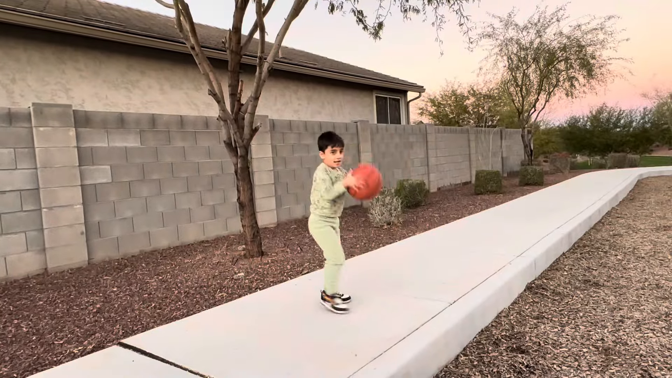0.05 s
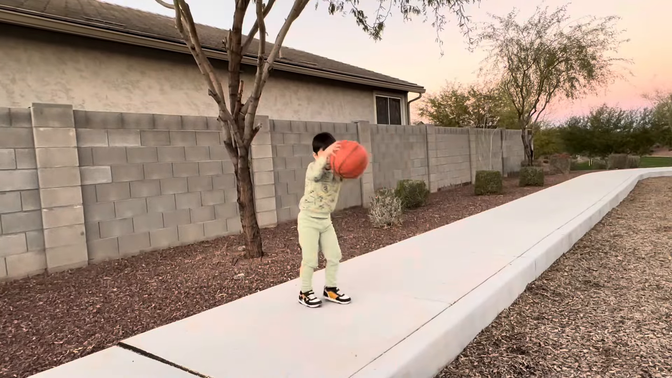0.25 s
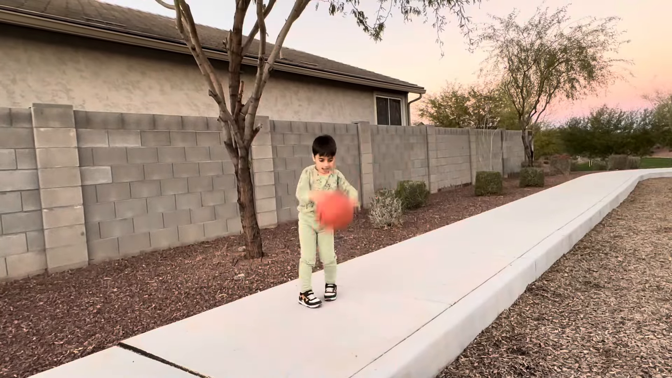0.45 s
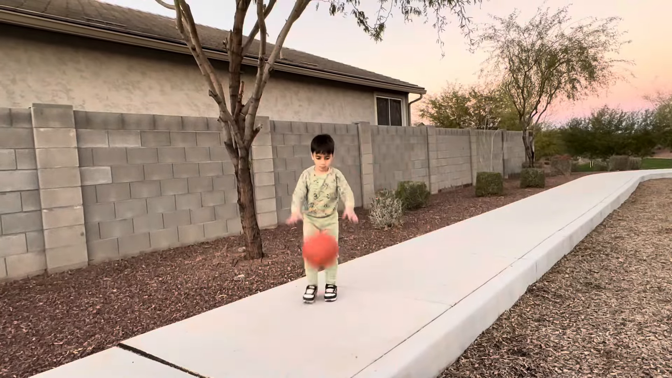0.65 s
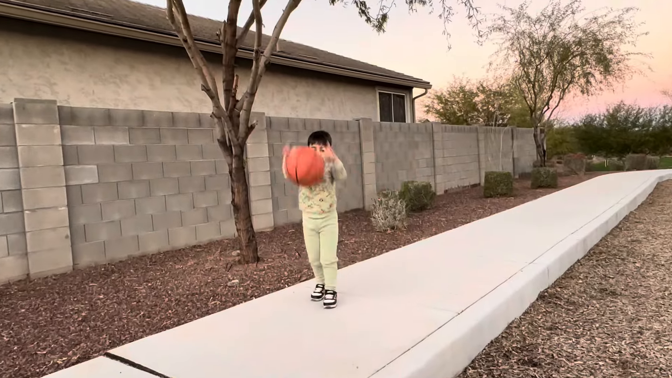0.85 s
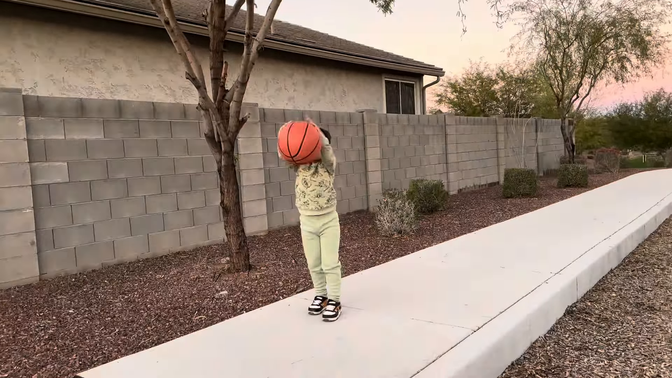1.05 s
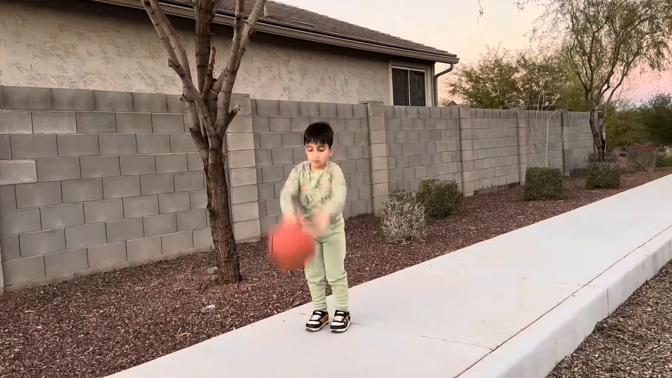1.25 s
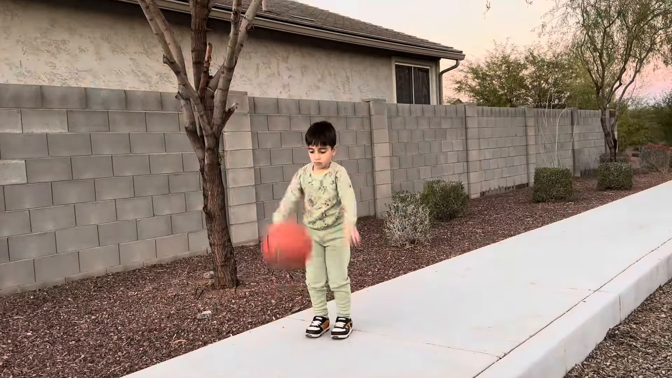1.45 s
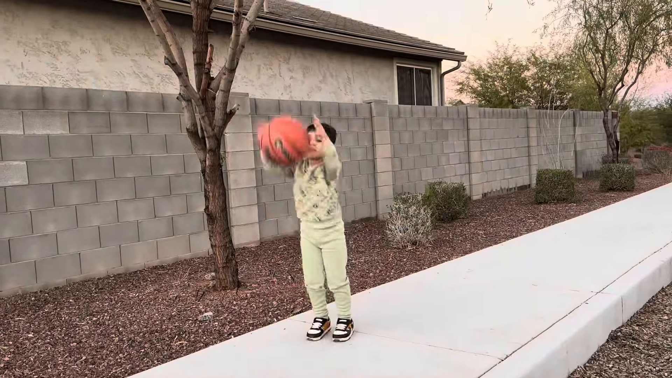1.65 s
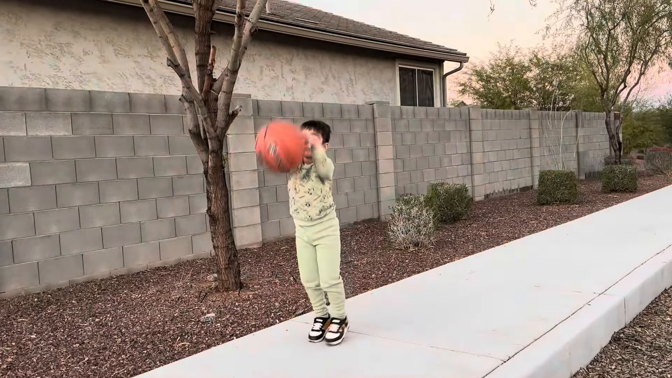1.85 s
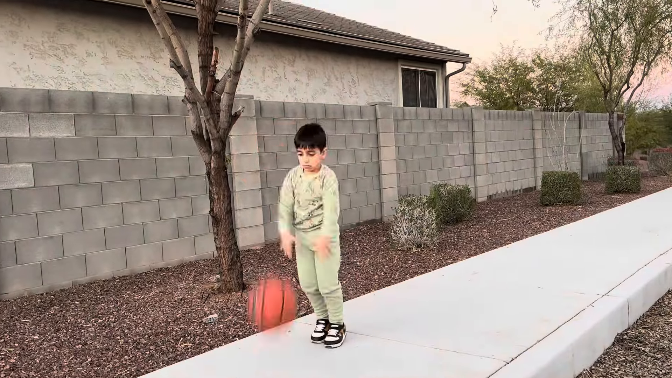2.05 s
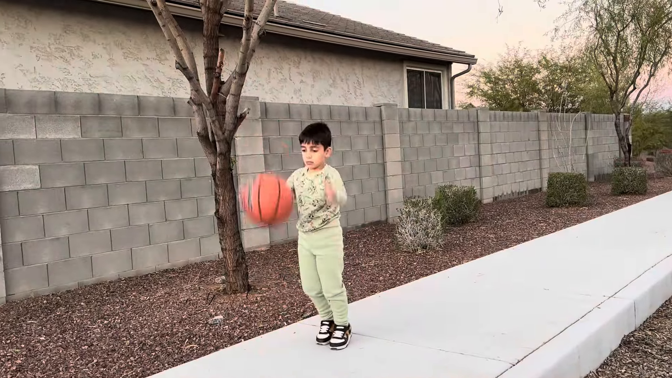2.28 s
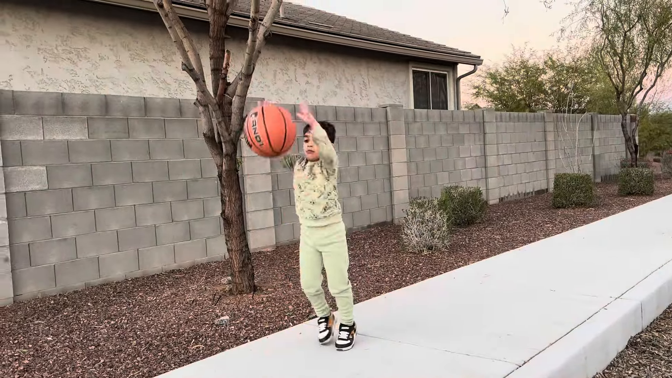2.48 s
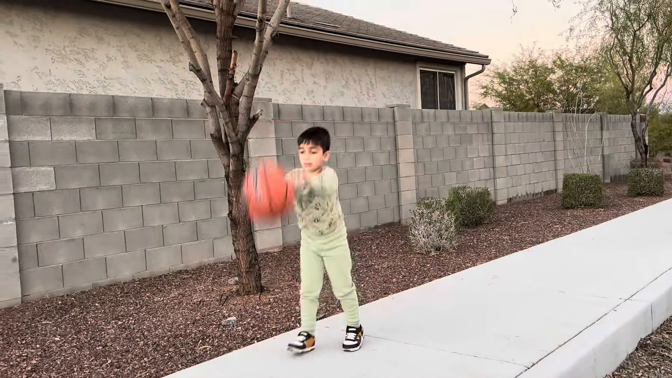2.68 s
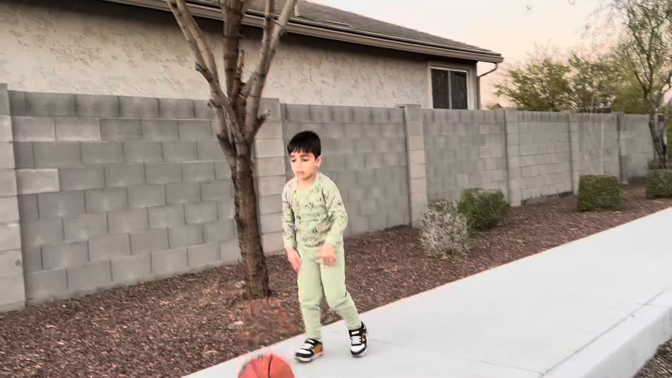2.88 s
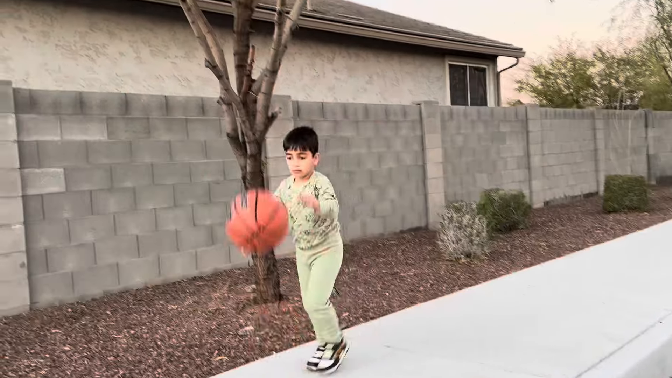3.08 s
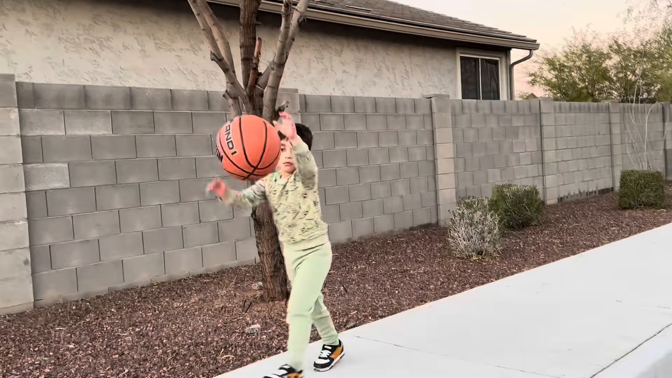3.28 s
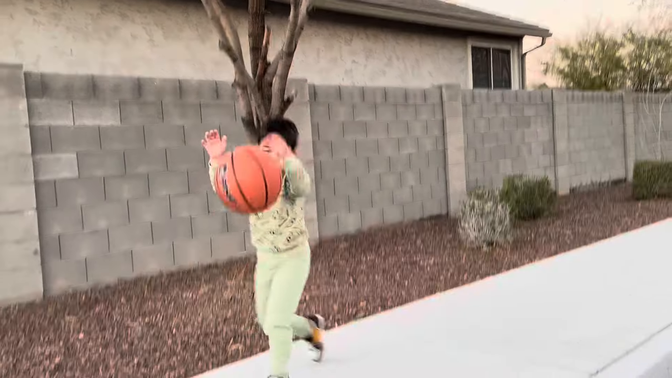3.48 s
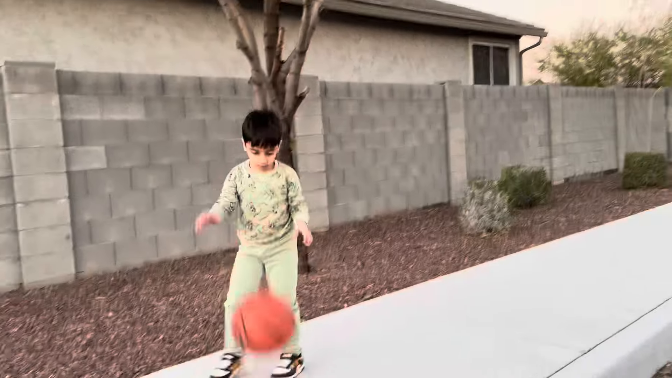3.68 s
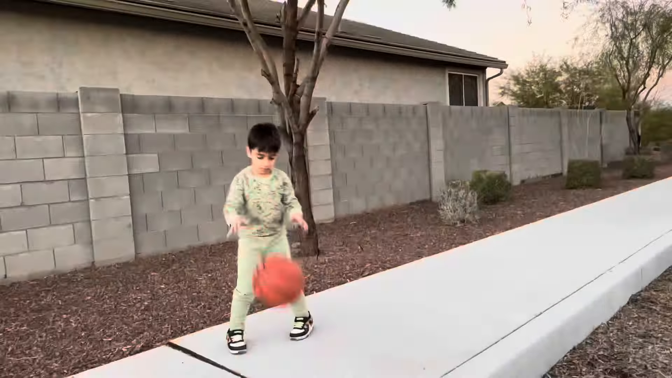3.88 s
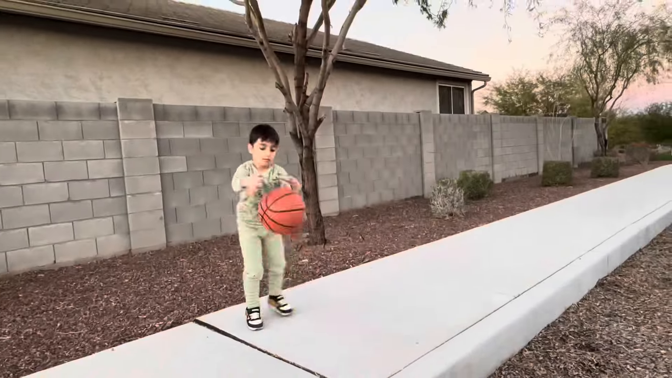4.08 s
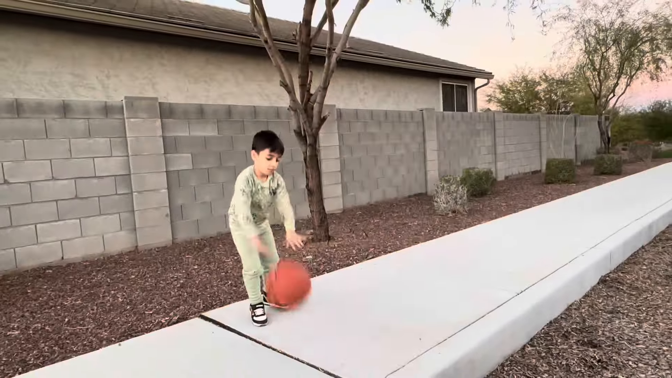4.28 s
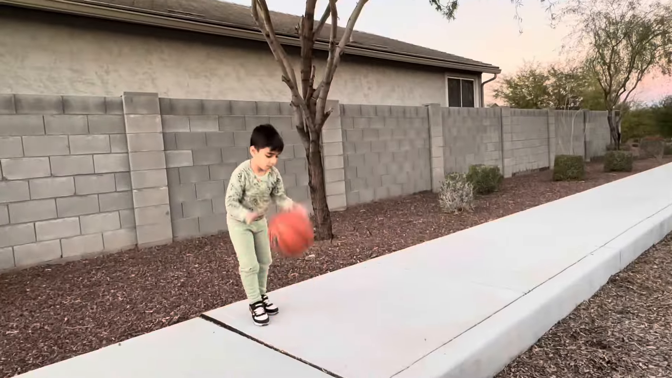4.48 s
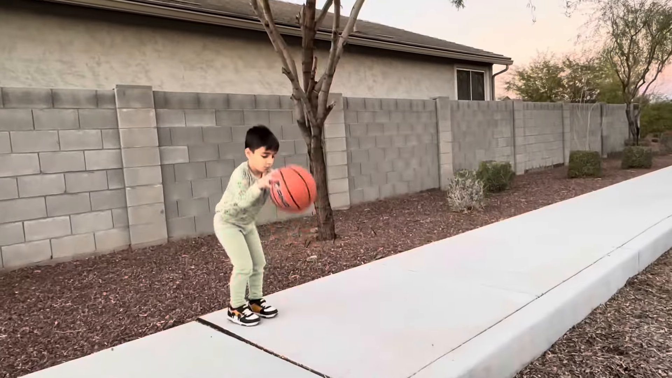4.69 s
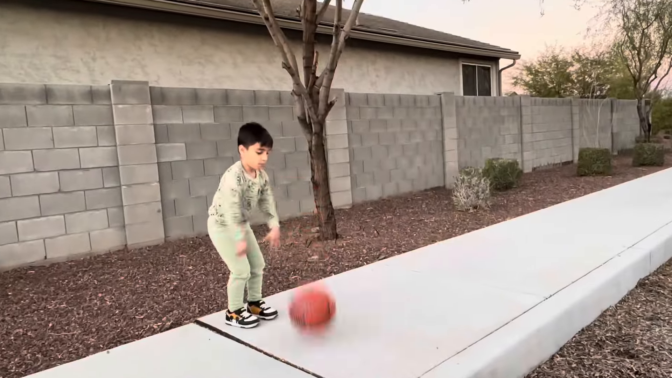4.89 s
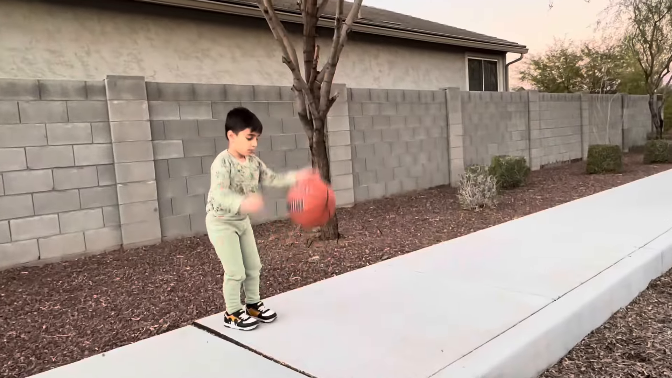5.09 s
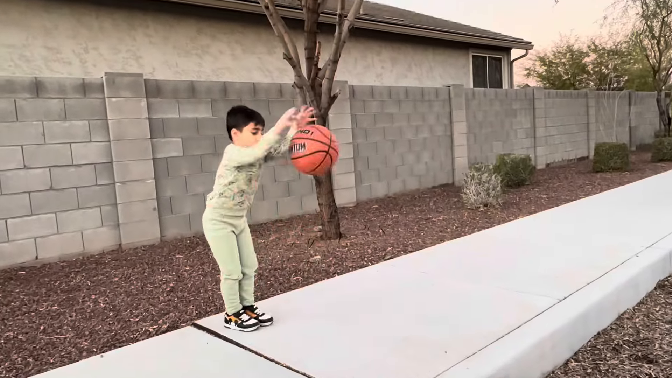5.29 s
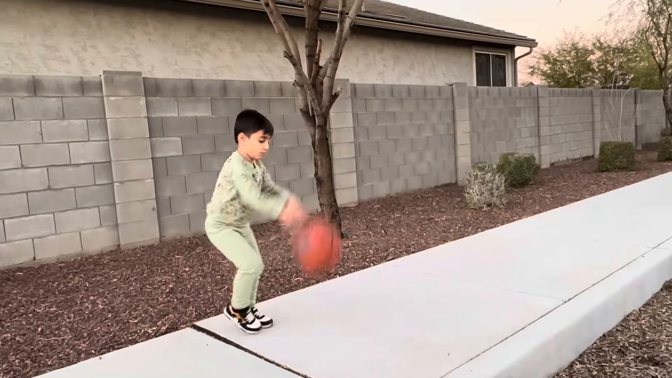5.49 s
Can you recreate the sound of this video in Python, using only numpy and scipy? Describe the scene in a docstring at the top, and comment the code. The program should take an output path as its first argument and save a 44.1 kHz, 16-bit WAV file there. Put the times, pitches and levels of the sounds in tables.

```python
"""Basketball beside a block wall

A child bounces a basketball seven times on concrete, on a quiet evening. Each bounce sums a filtered click,
a damped sine knock, a gliding-sine thump, shell modes and faint beating air modes; delayed copies are echoes.
Hands and shoes are tones in noise bands, scuffs and rustles grainy noise, one faint chirp narrow noise.
Distant traffic is filtered noise that drifts in level.
"""
import sys
import numpy as np
from scipy import signal
from scipy.fft import rfft, irfft
from scipy.io import wavfile
from scipy.ndimage import uniform_filter1d

SR = 44100
rng = np.random.default_rng(int(sys.argv[2]) if len(sys.argv) > 2 else 0)


def wav_out(sig):
    """Save sig, one row per channel (or a flat mono array), as 16-bit PCM at SR to the path in sys.argv[1]."""
    wavfile.write(sys.argv[1], SR, np.round(np.clip(np.atleast_2d(sig).T, -1, 1) * 32767).astype(np.int16))


N = 244314

# distant traffic spectrum: (frequency [Hz], relative density [dB])
TRAFFIC_SPECTRUM = [(15, -35.5), (25, -10.5), (60, -1), (120, 0), (150, -8.5), (280, -11), (480, -19.5),
                    (950, -14), (1500, -23.5), (2200, -27.5), (3200, -39.5), (5000, -46.5), (8000, -52.5),
                    (16000, -67)]
# traffic drift, used about its mean and scaled down: (time [s], relative level [dB])
TRAFFIC_DRIFT = [(0.0, -57.5), (1.25, -58.5), (1.53, -57), (2.76, -57.5), (3.08, -61.5), (4.29, -56),
                 (5.18, -61), (5.54, -60.5)]
# likeness of the two ears for far sound: (frequency [Hz], likeness [0-1])
EAR_LIKENESS = [(100, 0.98), (400, 0.6), (1000, 0), (2500, 0.1), (8000, 0.3)]
# soles brushing the path: (time [s], length [s], level [dB])
SCUFFS = [(0, .21, -53.5), (.362, 0.067, -65), (.744, 0.08, -56), (0.801, 0.19, -66), (1.149, 0.052, -55)]
# friction spectrum: (frequency [Hz], relative level [dB])
BRUSH_SPECTRUM = [(300, -10.5), (1500, 2.5), (3500, 0), (6000, -2.5), (9000, -4.5), (16000, -4.5)]
# hands on the ball, low palm push to high finger slap: (time [s], level [dB], pitch [Hz], tick level [dB])
PATS = [(.026, -53, 484, -65), (.371, -52, 460, -59.5), (2.58, -42, 420, -61), (3.566, -47.5, 261.3, -47.5),
        (3.593, -43, 211, -52), (4.161, -40.5, 365, -56), (4.744, -42, 316, -49.5),
        (4.768, -40, 223.7, -63), (5.351, -38, 421, -63), (5.382, -44, 428, -60.5)]
# bounces: (time [s], force [dB], squash time [s], bite [dB], sizzle [dB],
#           knock pitch [Hz], knock level [dB], shell wobble [dB])
BOUNCES = [(.5752, -1, .016, 3.5, -1.5, 920, -12, 1), (1.335, .5, 0.01385, -1.5, 4, 932, -7.5, -2.5),
           (2.083, 1, 0.015, -8, 3.5, 990, -9, 0), (2.8698, 2, .0108, -3.5, -4, 332, -19.5, -2.5),
           (3.7667, -4, 0.016, -3, 3, 1870, -23, 5), (4.3375, -3, 0.01332, 2.5, .5, 924, -16.5, -0.5),
           (4.8861, .5, .012, -1.5, 1.5, 1120, -9.5, 5)]
# rubber on concrete: (frequency [Hz], relative level [dB])
CRACK_SPECTRUM = [(100, -27), (300, -12), (700, 8), (1200, 4.5), (1600, 1), (2200, 2.5), (3000, -2.5),
                  (4600, -4.5), (6200, -11), (9000, -11), (12000, -15.5), (16000, -18)]
# thump glide: (first pitch [Hz], last pitch [Hz], time constant [s])
THUMP_GLIDE = (355, 66, .0062)
# rubber shell modes: (frequency [Hz], relative level [dB], t60 [s])
SHELL_MODES = [(193, -23.5, 0.086), (249.6, -24.5, 0.11), (360.2, -24.5, 0.1), (381.7, -26, 0.11),
               (470.5, -26, 0.09), (681, -27, .06), (823.5, -28.5, 0.085), (1007, -32, 0.087)]
# modes of the air in the ball: (frequency [Hz], relative level [dB], t60 [s])
AIR_MODES = [(955, -41.5, 0.31), (1510, -64.5, 0.24), (2100, -55.5, 0.51), (2756, -60.5, 1.7),
             (3360, -67, 1.7), (3550, -69.5, 1.2), (4030, -68.5, .9), (4276, -66.5, 1.3), (4600, -66.5, .5)]
# ball to wall as the child wanders: (time [s], distance [m])
WALL_DISTANCE = [(.58, 3.06), (2.08, 2.94), (3.77, 3.2), (4.89, 3.18)]
# scatter from gravel, house and trees: (frequency [Hz], relative level [dB], t60 [s])
YARD_SCATTER = [(60, -20, 0.26), (200, -20.5, 0.26), (490, -9, 0.17), (1000, -13.5, 0.15),
                (2520, -16, 0.24), (5350, -10.5, 0.25), (8700, -10.5, 0.19), (16130, -19.5, 0.092)]
# shoes on concrete: (time [s], level [dB], pitch [Hz], tick level [dB])
STEPS = [(1.278, -47.5, 527, -58.5), (2.0532, -39.5, 2380, -43), (2.699, -39, 300, -54),
         (4.4316, -35, 430, -56)]
# one faint chirp: (time [s], length [s], level [dB])
CHIRP = (5.46, 0.14, -62.5)
# microphone ports: (frequency [Hz], phase by which left leads [rad])
PORT_PHASE = [(50, 0), (400, 0), (900, -.25), (1810, .3), (3010, 1.1), (4570, 0), (6630, .2), (7580, 3.5),
              (8350, 6), (9560, 5), (11000, 3.1), (13900, .3), (16000, -.4)]
# port balance: (frequency [Hz], left minus right [dB])
PORT_BALANCE = [(100, -.5), (350, .4), (700, -2.4), (1400, -1.5), (2800, 2.3), (5600, 1.7), (11000, .3)]
# microphone colour: (frequency [Hz], gain [dB])
MIC_COLOUR = [(20, -15), (45, 0.5), (9700, 2), (11000, -5.5), (11900, -16.5), (13300, -1.5), (15500, -0.5),
              (16500, -8)]

TRAFFIC_DB, DRIFT_SHARE = -50, 0.46
SCUFF_DB_PER_OCTAVE = 1.5
RUSTLES_PER_S, RUSTLE_S, RUSTLE_DB, RUSTLE_DB_PER_OCTAVE = 1.7, 0.099, -69.5, -3
PAT_HZ, PAT_DECAY_S, PAT_DAMPING_POWER = 454, 0.011, 1.9  # lower pats ring longer
CLAP_HZ, CLAP_DB, CLAP_DB_PER_OCTAVE, CLAP_DECAY_S = 1010, -0.5, 23, .011  # stronger in a slap
PALM_HZ, PALM_DB, PALM_DECAY_S = 230, -4, 0.01
TAP_RISE_S = .0008
# part levels of a bounce of force 0 dB and reference squash time
THUMP_DB, CRACK_DB, SHELL_DB, AIR_DB, SQUASH_S = -10, -1.2, 1, -6, .0135
CRACK_DB_PER_DB = 0.18  # the crack grows more slowly than the force
SHELL_DB_PER_HALVING = 6.5  # a quicker squash shakes the shell harder
BITE_HZ, SIZZLE_HZ = 4160, 8350  # crack bands set per bounce
WOBBLE_HZ, WOBBLE_OCTAVES = 380, .5  # band of shell modes set per bounce
SLAP_S, SLAP_POWER = .0025, 1.8  # second slap of the skin, later in a slower squash
SOUND_M_PER_S = 343
STEP_DECAY_S = 0.0061
GRIT_PER_S, GRIT_DB, GRIT_HZ, GRIT_DECAY_S = 2, -68, 900, .003
CHIRP_HZ = 3300
EDGE_HZ = 16700


def gain_of(db):
    """Amplitude factor of a level in dB."""
    return 10 ** (np.asarray(db) / 20)


def evened(x):
    """Scales x to an RMS of 1."""
    return x / np.sqrt(np.mean(x ** 2) + 1e-20)


def read(points, hz):
    """Interpolates a table on a log frequency axis."""
    f, value = np.transpose(points)
    return np.interp(np.log(hz + 1), np.log(f + 1), value)


def bins(size):
    """Frequencies of the real FFT bins, in Hz."""
    return np.fft.rfftfreq(size, 1 / SR)


def octaves(hz, centre_hz):
    """Distance from the centre in octaves, offset to stay finite at 0 Hz."""
    return np.log2((hz + 20) / centre_hz)


def add(mix, s, sound):
    """Adds a sound to the mix at time s, cut at the end."""
    part = mix[..., max(round(s * SR), 0):][..., :sound.shape[-1]]
    part += sound[..., :part.shape[-1]]


def coloured(x, db):
    """Filters x by a gain in dB for each frequency bin."""
    return irfft(rfft(x) * gain_of(db), x.shape[-1])


def noise_of(size, db):
    """Noise of RMS 1 with a spectrum in dB."""
    return evened(coloured(rng.standard_normal(size), db))


def delayed(x, s, corner_hz):
    """A later copy that has lost treble above the corner."""
    hz = bins(x.shape[-1])
    shift = np.exp(-2j * np.pi * hz * s)
    return irfft(rfft(x) * shift / (1 + 1j * hz / corner_hz), x.shape[-1])


def two_ears(a, b):
    """Two unrelated signals become a pair that is alike in the bass."""
    same = np.clip(read(EAR_LIKENESS, bins(len(a))), 0, 1)
    mid = rfft(a) * np.sqrt((1 + same) / 2)
    side = rfft(b) * np.sqrt((1 - same) / 2)
    return irfft(np.array([mid + side, mid - side]), len(a))


def traffic(flutter_db=0.55):
    """A far, dull wash of noise that drifts and flutters slowly in level."""
    hiss = evened(coloured(two_ears(*rng.standard_normal((2, N))), read(TRAFFIC_SPECTRUM, bins(N))))
    s, db = np.transpose(TRAFFIC_DRIFT)
    drift_db = DRIFT_SHARE * np.interp(np.arange(N) / SR, s, db - db.mean())
    flutter = noise_of(N, -np.minimum(bins(N) * 2, 120))
    return hiss * gain_of(TRAFFIC_DB + drift_db + flutter_db * flutter)


def stroke(length_s):
    """The swell and fade of a short stroke."""
    return np.hanning(int(np.clip(length_s, .01, .45) * SR)) ** .63


def rub(length_s, db_per_octave, grain_db=3):
    """One stroke of friction: noise made grainy by fast random level changes."""
    noise, grains = rng.standard_normal((2, SR // 2))
    grainy = noise * gain_of(grain_db * evened(uniform_filter1d(grains, size=60)))
    hz, swell = bins(len(grainy)), stroke(length_s)
    brush_db = read(BRUSH_SPECTRUM, hz) + db_per_octave * octaves(hz, 4000)
    return evened(coloured(grainy, brush_db))[:len(swell)] * swell


def scuffs():
    """Soles brush the path; sleeves rustle fainter and duller."""
    out, count = np.zeros(N), round(RUSTLES_PER_S * N / SR)
    for s, length_s, db in SCUFFS:
        add(out, s, gain_of(db) * rub(length_s, SCUFF_DB_PER_OCTAVE))
    for s in (np.arange(count) + rng.random(count)) / RUSTLES_PER_S:
        add(out, s, gain_of(RUSTLE_DB) * rub(RUSTLE_S, RUSTLE_DB_PER_OCTAVE))
    return out


def blow(t, pitch_hz, decay_s, tone, width, rise_s=0.0024):
    """A soft, damped blow: a tone in a noise band that falls by width dB per octave."""
    band = noise_of(len(t), -width * abs(octaves(bins(len(t)), pitch_hz)))
    body = evened(tone * np.sin(2 * np.pi * pitch_hz * t) + band)
    return body * np.exp(-t / decay_s) * (1 - np.exp(-t / rise_s))


def tick(t, tick_s=0.0026, spread_s=.01, spread_db=-14):
    """A tick of skin or grit and a brief slide after it."""
    hz = bins(len(t))
    fizz = noise_of(len(t), read(BRUSH_SPECTRUM, hz) - 4 * np.maximum(octaves(hz, 2500), 0))
    return fizz * (np.exp(-t / tick_s) + gain_of(spread_db) * np.exp(-t / spread_s))


def pats():
    """A hand meets the ball: the shell gives, air claps under the hand, the palm pushes, skin ticks."""
    t, out = np.arange(SR // 4) / SR, np.zeros(N)
    for s, db, pitch_hz, tick_db in PATS:
        decay_s = PAT_DECAY_S * (PAT_HZ / pitch_hz) ** PAT_DAMPING_POWER
        clap_db = CLAP_DB + CLAP_DB_PER_OCTAVE * np.log2(pitch_hz / PAT_HZ)
        body = blow(t, pitch_hz, decay_s, tone=1.4, width=17)
        clap = gain_of(clap_db) * blow(t, CLAP_HZ, CLAP_DECAY_S, tone=1.2, width=22, rise_s=TAP_RISE_S)
        palm = gain_of(PALM_DB) * blow(t, PALM_HZ, PALM_DECAY_S, tone=.3, width=13, rise_s=TAP_RISE_S)
        add(out, s, gain_of(db) * (body + clap + palm) + gain_of(tick_db) * tick(t))
    return out


def onset_fizz(t, db=-15, rise_s=0.00075):
    """A very short fizz of noise that swells into the crack and ends there."""
    fizz = noise_of(len(t), read(BRUSH_SPECTRUM, bins(len(t))))
    return gain_of(db) * fizz * np.exp(-t[::-1] / rise_s)


def click(db):
    """The minimum-phase pulse with this spectrum, peak 1."""
    log_gain = np.log(gain_of(np.r_[db, db[-2:0:-1]]))
    pulse = np.fft.ifft(np.exp(np.conj(signal.hilbert(log_gain)))).real
    return pulse / abs(pulse).max()


def crack(t, bite_db, sizzle_db, grit_db=-26, grit_s=0.0031, spread=0.99):
    """Pebbled rubber meets concrete: one sharp click and a brief crush of grit, per ear."""
    hz = bins(len(t))
    bite = bite_db * np.exp(-(octaves(hz, BITE_HZ) / 0.53) ** 2)
    sizzle = sizzle_db * np.exp(-(octaves(hz, SIZZLE_HZ) / 0.32) ** 2)
    pulse = click(read(CRACK_SPECTRUM, hz) + bite + sizzle)
    shared, apart = rng.standard_normal((2, len(t)))
    ears = np.array([shared + spread * apart, shared - spread * apart])
    grit = gain_of(grit_db) * ears * np.exp(-t / grit_s)
    return -pulse - signal.fftconvolve(grit, pulse[None], axes=1)[:, :len(t)]


def knock(t, hz, decay_s=0.0015):
    """The rubber shell knocks: a sine damped within a few milliseconds."""
    return np.sin(2 * np.pi * hz * t) * np.exp(-t / decay_s)


def thump(t, swell_s, steep=1.27, release_s=0.048):
    """The ball flattens and springs back: a push of air whose pitch falls as the contact widens."""
    start_hz, end_hz, glide_s = THUMP_GLIDE
    turns = end_hz * t + (start_hz - end_hz) * glide_s * (1 - np.exp(-t / glide_s))
    swell = (t / swell_s * np.exp(1 - t / swell_s)) ** steep
    return -np.sin(2 * np.pi * turns) * swell * np.exp(-(t / release_s) ** 4)


def shell_ring(t, wobble_db, vary_db=1.5, detune=0.024):
    """Damped shell modes, random in level and pitch per bounce; wobble_db lifts those near WOBBLE_HZ."""
    out = np.zeros(len(t))
    draws = rng.standard_normal((len(SHELL_MODES), 2))
    for k, ((hz, db, t60), (a, b)) in enumerate(zip(SHELL_MODES, draws)):
        lift_db = wobble_db * np.exp(-(octaves(hz, WOBBLE_HZ) / WOBBLE_OCTAVES) ** 2)
        level = gain_of(db + vary_db * a + lift_db - 60 * t / t60)
        out += level * np.sin(2 * np.pi * hz * (1 + detune * b) * t) * (-1) ** k
    return out


def ball_air(t, beat_hz=4.5, twin=0.58, rise_s=0.023, vary_db=2.5):
    """The enclosed air pings; the ball is not quite round, so each mode is a pair that blooms and beats."""
    out = np.zeros(len(t))
    draws = rng.standard_normal((len(AIR_MODES), 2))
    for (hz, db, t60), (a, b) in zip(AIR_MODES, draws):
        twin_hz = hz + beat_hz * np.exp(0.33 * b)
        pair = np.sin(2 * np.pi * hz * t) - twin * np.sin(2 * np.pi * twin_hz * t)
        out += gain_of(db + vary_db * a - 60 * t / t60) * pair
    return out * (1 - np.exp(-t / rise_s))


def smeared(x, t, share, smear_s):
    """An echo from a rough surface: a mirror part and a few milliseconds of scatter."""
    rough = rng.standard_normal(x.shape) * np.exp(-t / smear_s)
    return x + share * signal.fftconvolve(x, rough / np.linalg.norm(rough[0]), axes=1)[:, :len(t)]


def echoed(top, t, wall_s, bank_db=-10, wall_db=-14, house_db=-24, bank_share=.64, house_share=1.85,
           wall_lift_db=5):
    """The crack returns from the gravel bank, the hard, bright block wall and the house behind it."""
    bank = delayed(smeared(top, t, share=1.0, smear_s=.003), bank_share * wall_s, corner_hz=2490)
    wall = delayed(smeared(top, t, share=0.15, smear_s=0.0014), wall_s, corner_hz=14000)
    wall = coloured(wall, wall_lift_db * np.clip(octaves(bins(len(t)), 2500), 0, 1))
    house = delayed(smeared(top, t, share=1.4, smear_s=0.0043), house_share * wall_s, corner_hz=8000)
    return top + gain_of(bank_db) * bank + gain_of(wall_db) * wall + gain_of(house_db) * house


def bounces(slap=0.16, shell_slap=1.06):
    """Short fizz, crack and knock, then thump, shell wobble and the ring of the air inside."""
    t, out = np.arange(SR) / SR, np.zeros((2, N))
    lead = t[:len(t) // 100]
    for s, force_db, squash_s, bite_db, sizzle_db, knock_hz, knock_db, wobble_db in BOUNCES:
        wall_s = 2 * np.interp(s, *np.transpose(WALL_DISTANCE)) / SOUND_M_PER_S
        slowness = squash_s / SQUASH_S
        crack_db = CRACK_DB + CRACK_DB_PER_DB * force_db
        shell_db = SHELL_DB - SHELL_DB_PER_HALVING * np.log2(slowness)
        snap = gain_of(crack_db) * crack(t, bite_db, sizzle_db)
        bonk = gain_of(knock_db) * knock(t, knock_hz)
        slap_s = SLAP_S * slowness ** SLAP_POWER
        top = snap + bonk + delayed(slap * snap + shell_slap * bonk, slap_s, corner_hz=2500)
        # long waves come back strongly from the bank and the wall
        low = gain_of(THUMP_DB + force_db) * thump(t, squash_s)
        low = low + 0.32 * delayed(low, 0.52 * wall_s, 2000) + 0.54 * delayed(low, wall_s, 2000)
        ring = gain_of(shell_db) * shell_ring(t, wobble_db) + gain_of(AIR_DB) * ball_air(t)
        add(out, s, echoed(top, t, wall_s) + low + ring)
        add(out, s - lead[-1], gain_of(crack_db) * onset_fizz(lead))
    return out


def steps():
    """Short, dead taps of the shoes; loose grains tick underfoot at random times."""
    t, out = np.arange(SR // 4) / SR, np.zeros(N)
    for s, db, pitch_hz, tick_db in STEPS:
        tap = blow(t, pitch_hz, STEP_DECAY_S, tone=.5, width=16, rise_s=TAP_RISE_S)
        add(out, s, gain_of(db) * tap + gain_of(tick_db) * tick(t))
    for s in rng.uniform(0, N / SR, round(GRIT_PER_S * N / SR)):
        grain = blow(t, GRIT_HZ, GRIT_DECAY_S, tone=.6, width=12) + tick(t)
        add(out, s, gain_of(GRIT_DB) * grain)
    return out


def chirp(width_hz=330, air_db=-2, air_db_per_octave=-6):
    """A faint, narrow whistle of filtered noise with a little hiss."""
    (s, length_s, db), out = CHIRP, np.zeros(N)
    swell = stroke(length_s)
    whistle = noise_of(SR, -20 * np.log10(1 + ((bins(SR) - CHIRP_HZ) / width_hz) ** 2))
    air = gain_of(air_db) * rub(length_s, air_db_per_octave)
    add(out, s, gain_of(db) * (whistle[:len(swell)] * swell + air))
    return out


def yard(x, rise_s=0.0098, far_db=-28, far_t60=0.64):
    """Open-air scatter, drawn afresh for each bounce: a short tail and a faint long one from far houses."""
    out, table = np.zeros((2, N)), np.array(YARD_SCATTER)
    edges = [0] + [int((row[0] - .1) * SR) for row in BOUNCES[1:]] + [N]
    for start, end in zip(edges, edges[1:]):
        hz, t, z = signal.stft(two_ears(*rng.standard_normal((2, SR))), SR, nperseg=256)
        t60 = read(table[:, ::2], hz)[:, None]
        fade = gain_of(-60 * t / t60) + gain_of(far_db - 60 * t / far_t60)
        level = gain_of(read(table[:, :2], hz))[:, None] * np.sqrt(np.log(10 ** 6) / (t60 * SR))
        # little scatter returns before the sound has reached the wall
        arrival = 1 - np.exp(-(t / rise_s) ** 2)
        tail = signal.istft(z * fade * level * arrival, SR, nperseg=256)[1]
        add(out, start / SR, signal.fftconvolve(x[None, start:end], tail, axes=1))
    return out


def ports(x):
    """Near sound reaches the two microphone ports with different phase and level."""
    hz = bins(N)
    tilt = gain_of(read(PORT_BALANCE, hz) / 2)
    return irfft(rfft(x) * np.array([tilt, np.exp(-1j * read(PORT_PHASE, hz)) / tilt]), N)


def scene():
    """Near sounds through the ports, their yard scatter, and the traffic."""
    near = bounces() + pats() + steps() + scuffs() + chirp()
    return ports(near) + yard(near.mean(0)) + traffic()


def record(dry):
    """Microphone colour, a soft ceiling on the cracks, then the band limit."""
    x = coloured(dry, read(MIC_COLOUR, bins(N)))
    x = x / (1 + (x / .95) ** 8) ** (1 / 8)
    lowpass = signal.firwin(511, EDGE_HZ, window=("kaiser", 9), fs=SR)
    return signal.oaconvolve(x, lowpass[None], "same")


dry = scene()
out = record(dry)
wav_out(out)
```